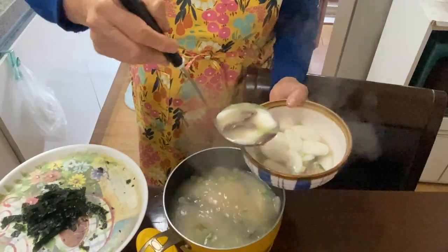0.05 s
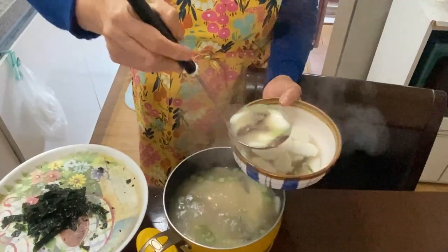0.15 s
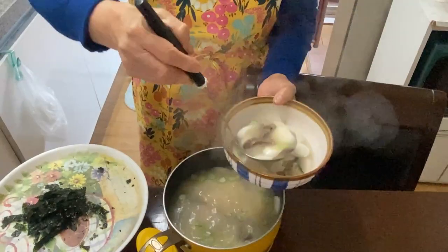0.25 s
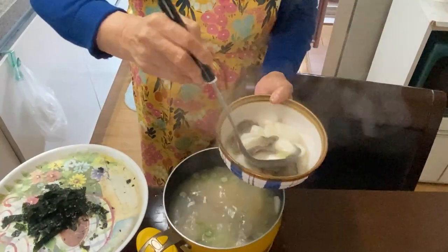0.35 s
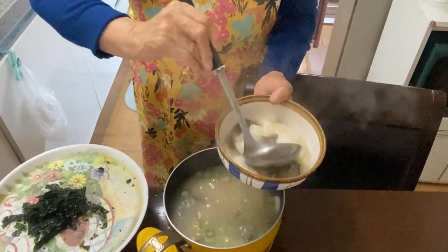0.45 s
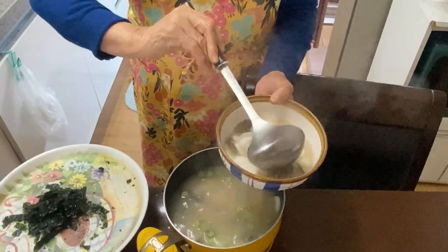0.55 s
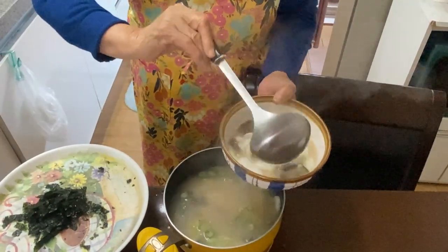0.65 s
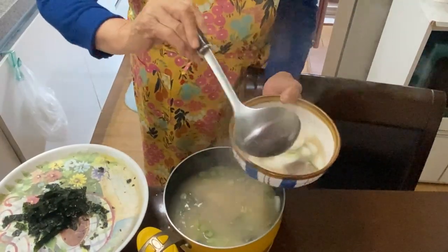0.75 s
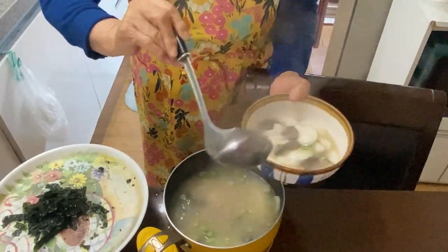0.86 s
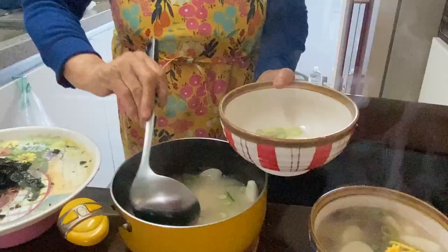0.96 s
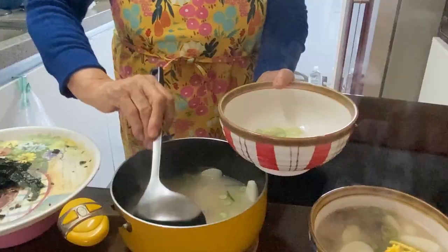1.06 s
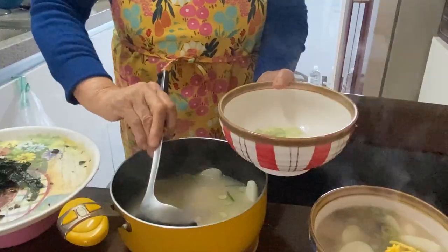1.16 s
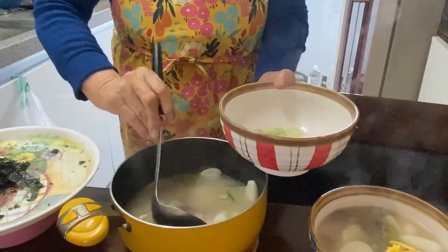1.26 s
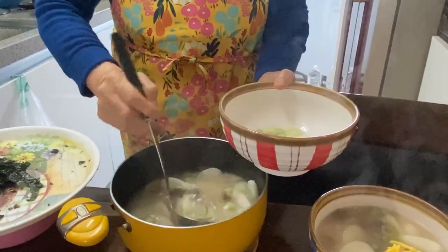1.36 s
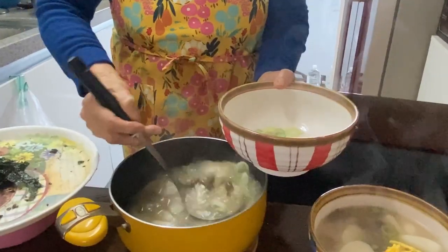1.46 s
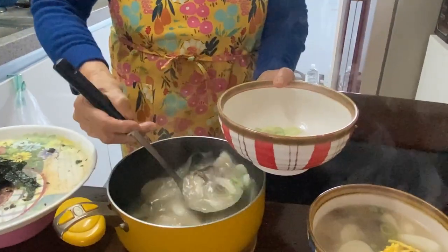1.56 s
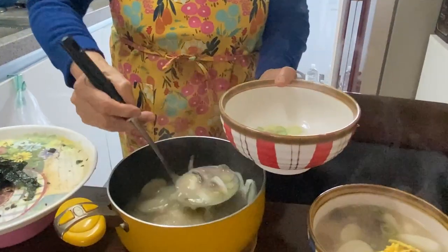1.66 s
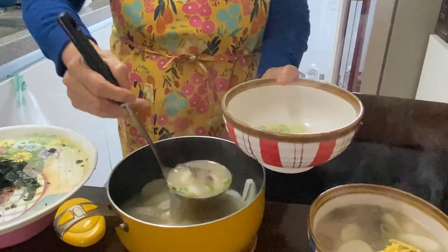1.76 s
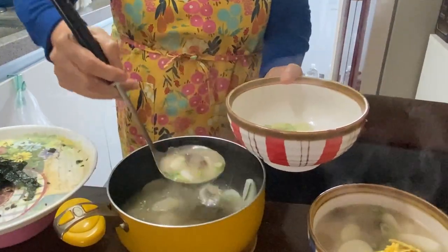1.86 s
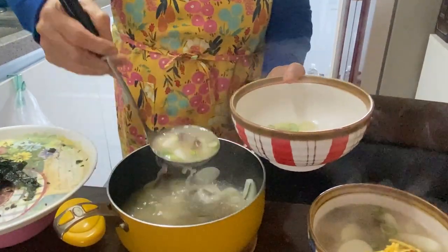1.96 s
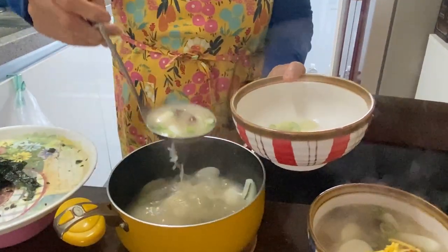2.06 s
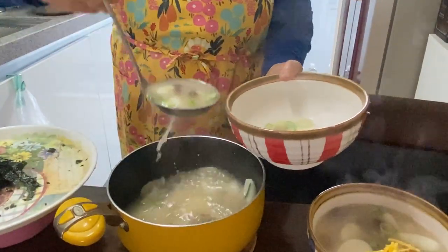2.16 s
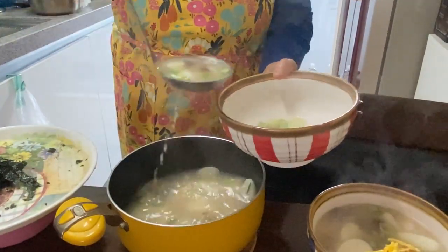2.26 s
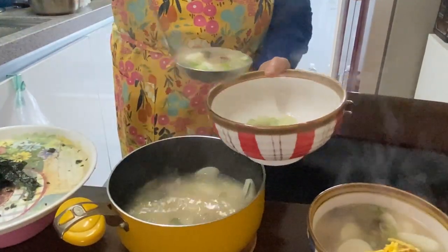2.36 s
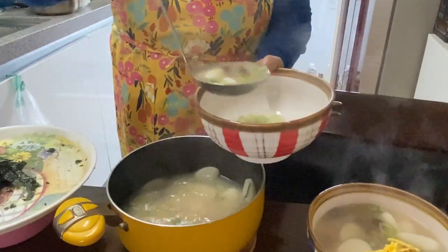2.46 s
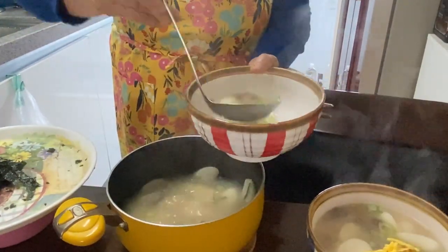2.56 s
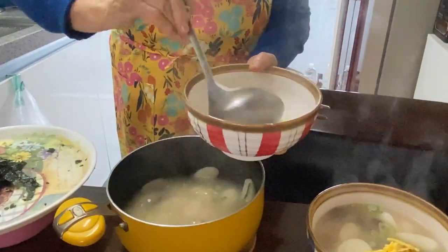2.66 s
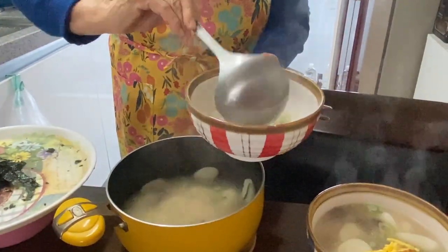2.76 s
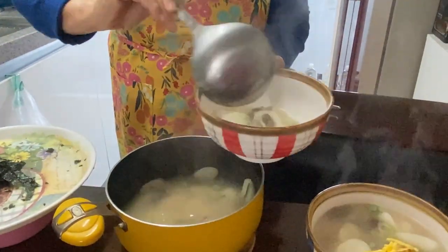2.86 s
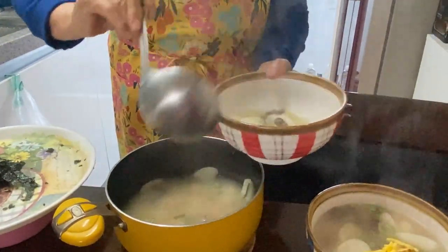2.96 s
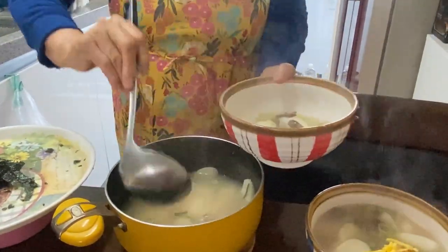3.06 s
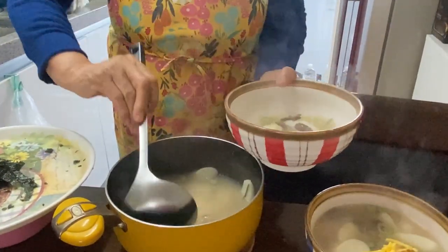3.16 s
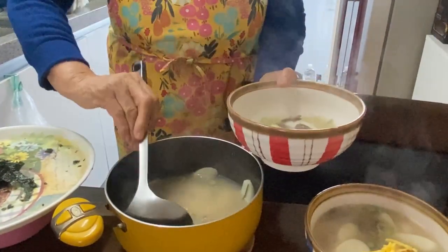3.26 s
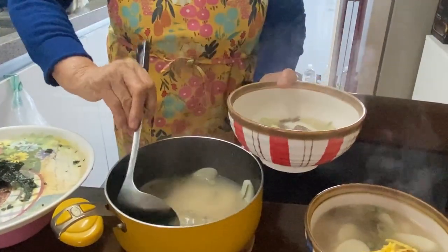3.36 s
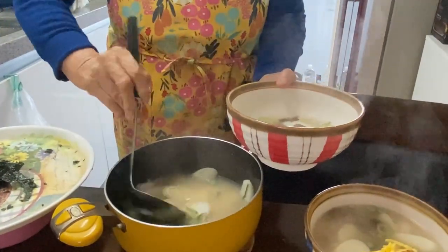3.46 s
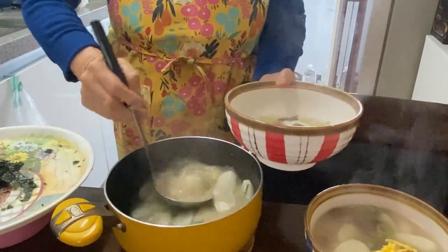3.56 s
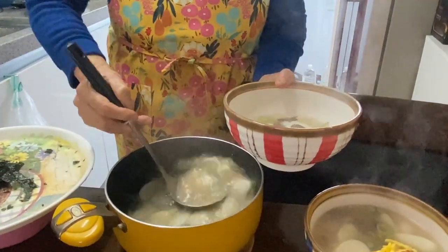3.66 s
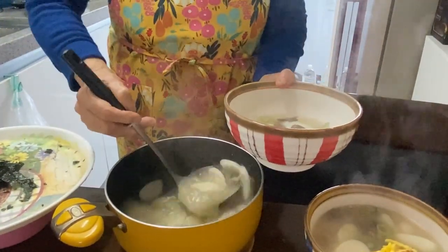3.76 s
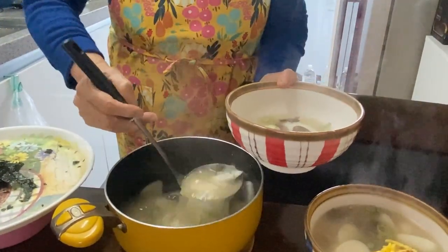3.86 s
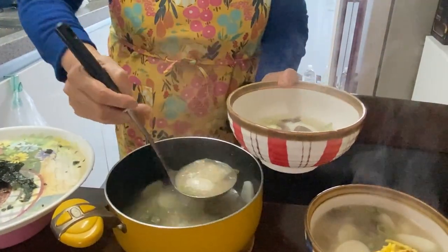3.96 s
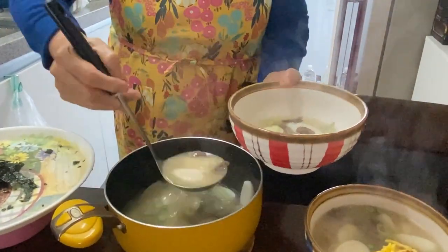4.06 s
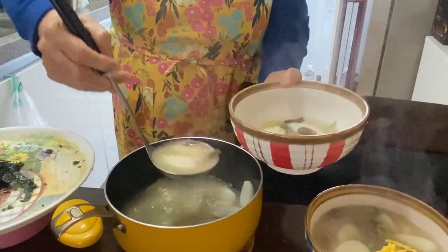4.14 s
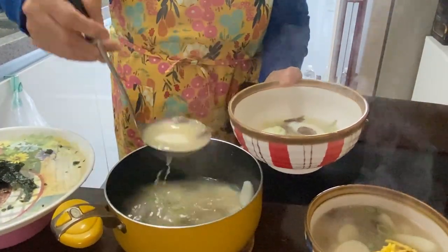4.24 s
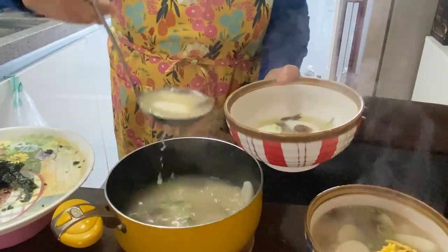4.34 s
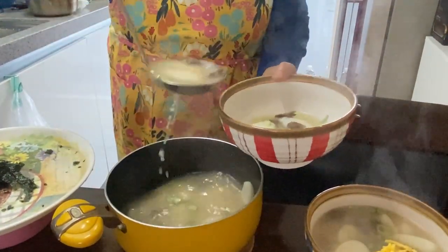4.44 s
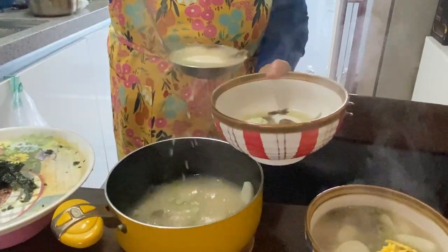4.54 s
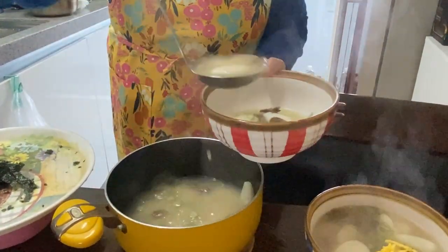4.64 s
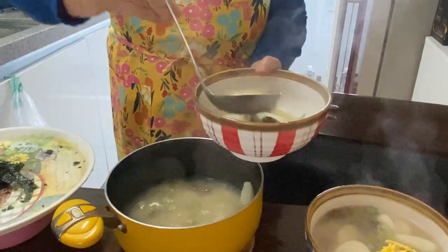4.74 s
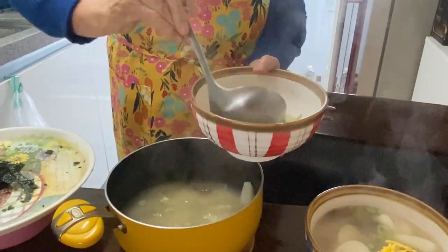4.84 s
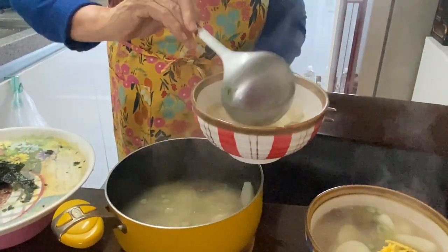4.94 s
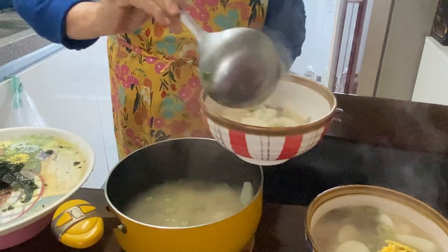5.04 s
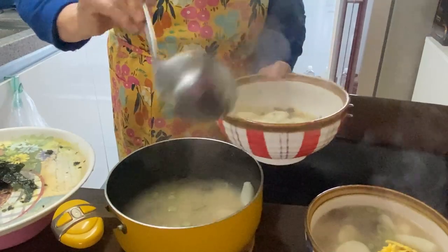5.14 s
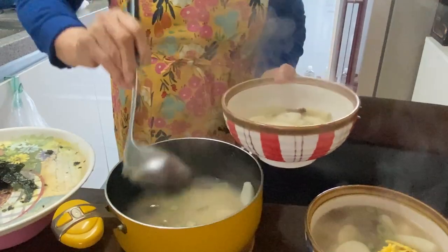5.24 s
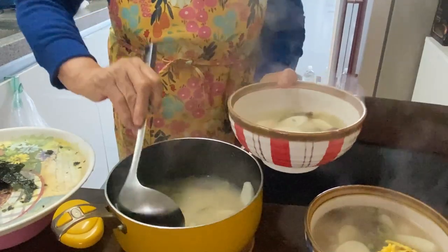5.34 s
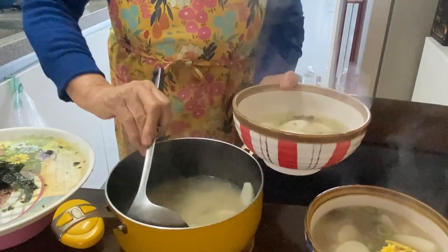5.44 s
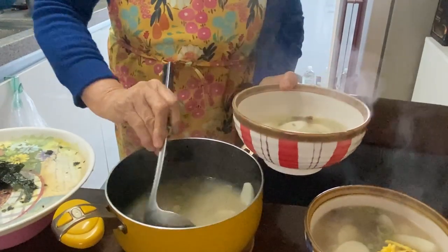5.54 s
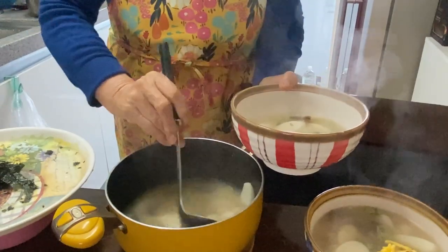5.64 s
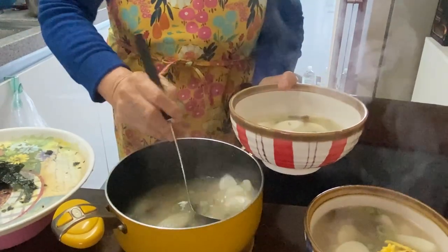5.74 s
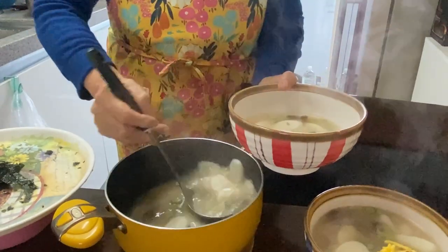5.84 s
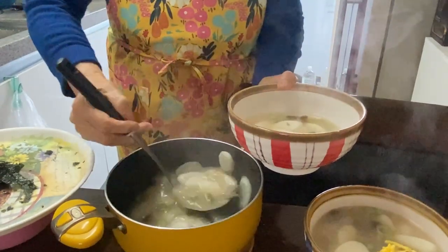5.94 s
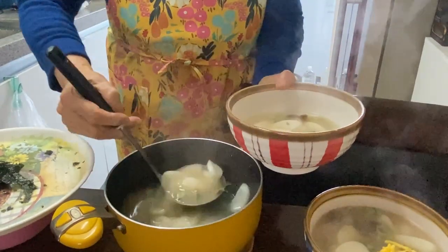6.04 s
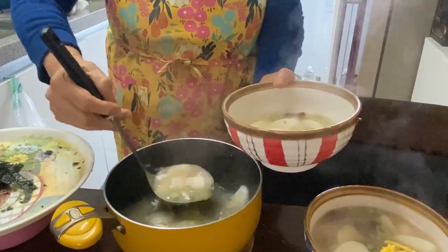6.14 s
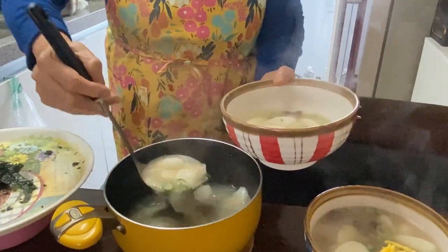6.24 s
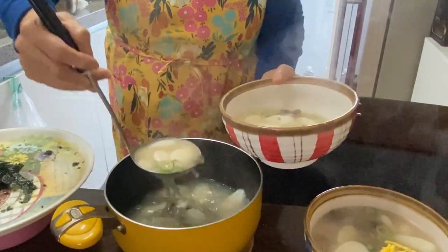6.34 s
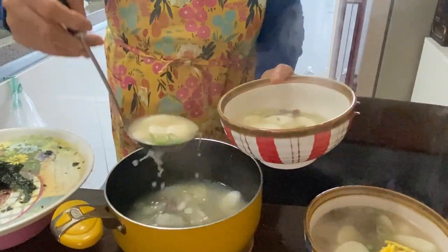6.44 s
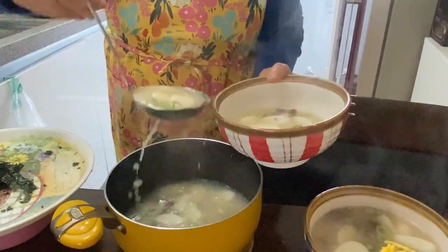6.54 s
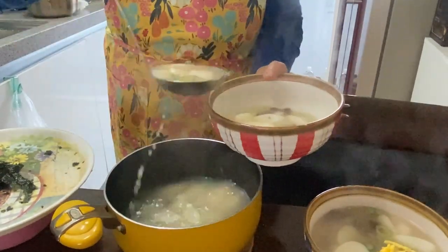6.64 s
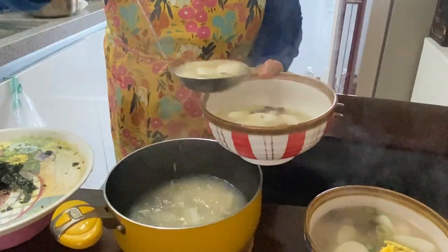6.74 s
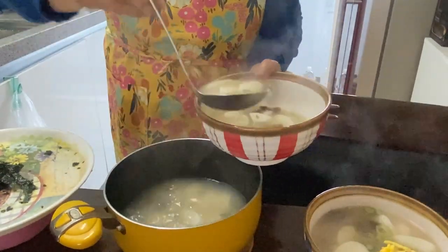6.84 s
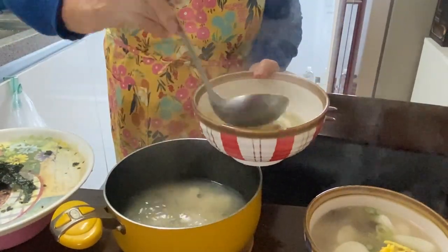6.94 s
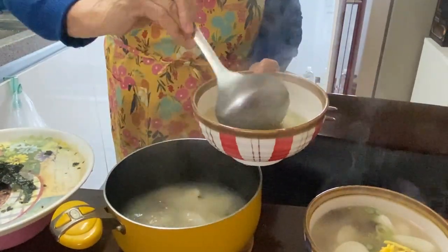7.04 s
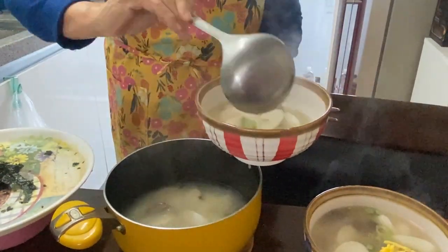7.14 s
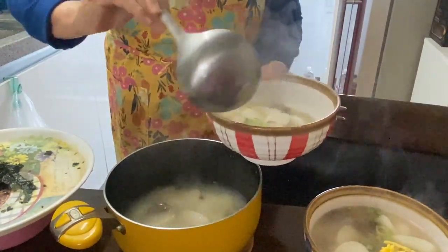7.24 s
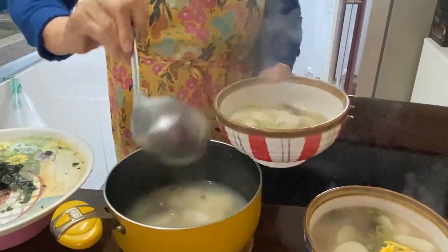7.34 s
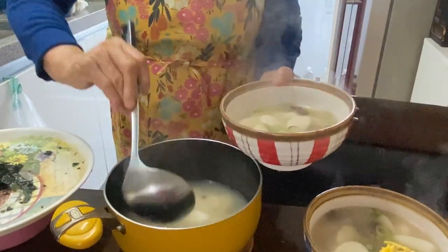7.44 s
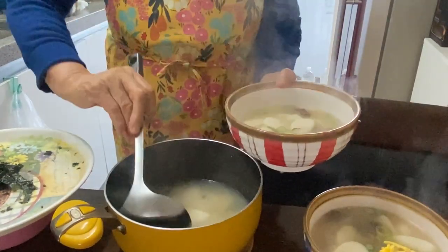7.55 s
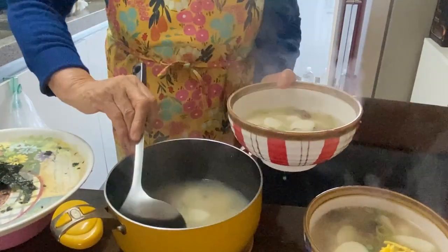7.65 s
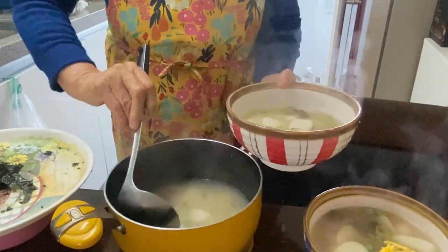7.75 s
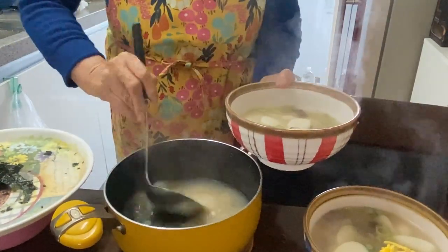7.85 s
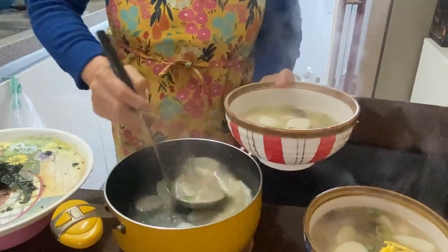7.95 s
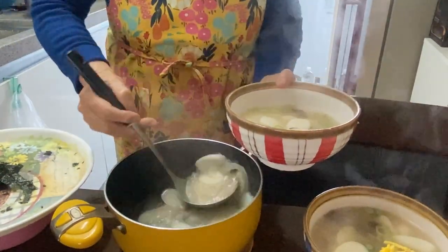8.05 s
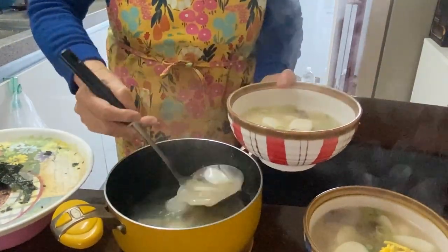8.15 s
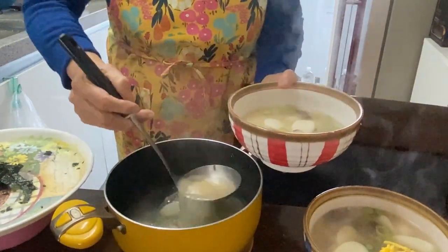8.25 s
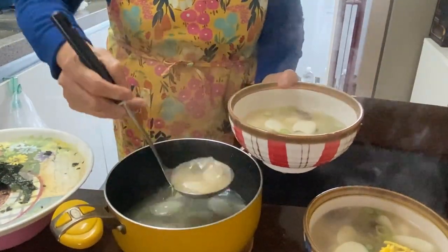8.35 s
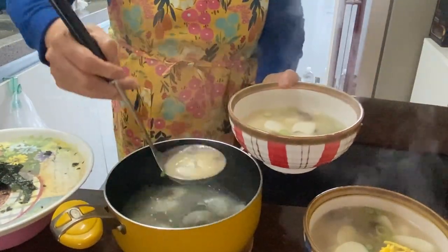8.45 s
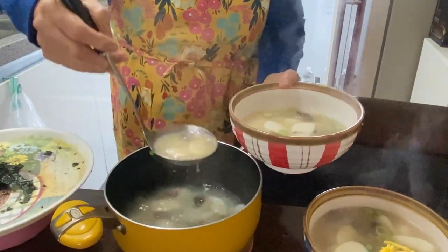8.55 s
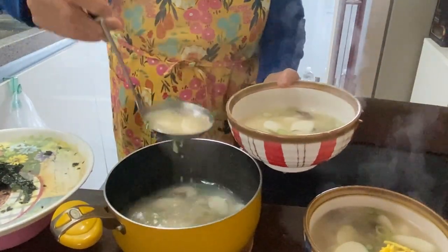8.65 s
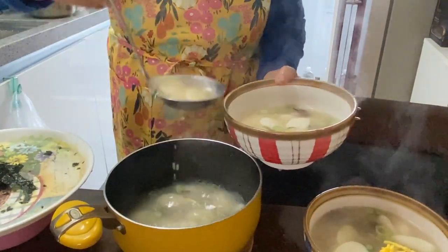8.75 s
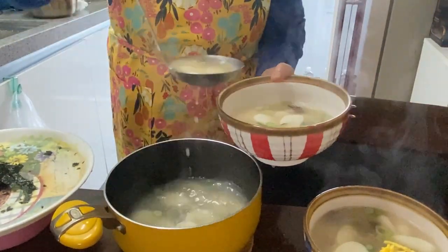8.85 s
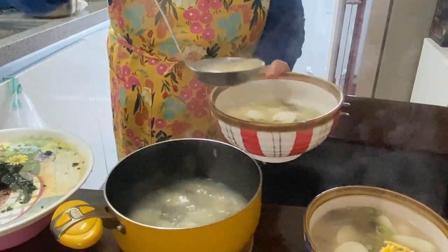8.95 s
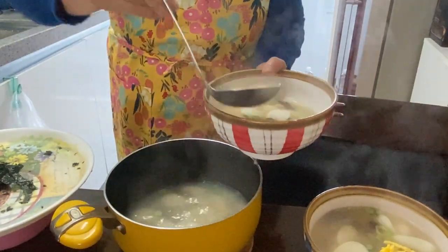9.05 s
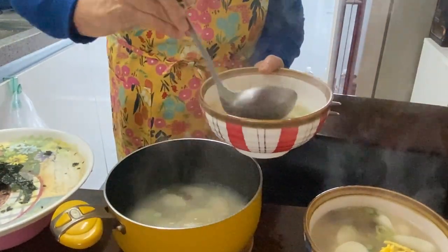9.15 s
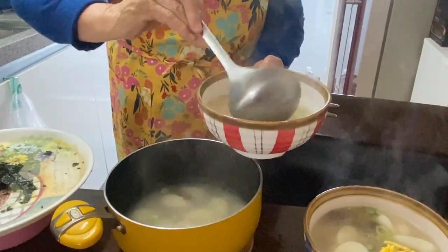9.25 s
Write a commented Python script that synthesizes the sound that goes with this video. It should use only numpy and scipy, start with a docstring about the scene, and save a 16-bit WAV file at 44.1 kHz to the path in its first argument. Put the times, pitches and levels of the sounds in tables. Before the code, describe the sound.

A thin steel ladle strikes a soup-filled pot about every two seconds, ringing briefly with a damped, bright clink. Thick soup gurgles while the rim chatters, followed by trickling droplets, small bubbly plops and gentle pouring. The pot nudges the table with dull low thuds. The microphone is near, with a short kitchen reverberation and a quiet airy background carrying weak hum and deep rumble.

```python
"""Soup drips, then in four rounds a steel ladle knocks a pot, drags through thick soup, lifts and empties.
Knocks are noise cracks over ringing modes; strokes are bubble noise and rim chatter, with thuds below.
Between rounds droplets and lumps sound as gliding bubbles and soup splashes as dense fine bubbles.
A small kitchen rings briefly; fan-like hiss, wavering hum and deep rumble of filtered noise run throughout."""
import sys
import numpy as np
from scipy import signal
from scipy.fft import rfft, irfft, next_fast_len
from scipy.io import wavfile
from scipy.ndimage import uniform_filter1d

SR = 44100
rng = np.random.default_rng(int(sys.argv[2]) if len(sys.argv) > 2 else 0)


def to_wav(sig):
    """Store sig (one row per channel, or 1-D mono) as 16-bit WAV at the path in sys.argv[1].

    Samples outside -1..1 are clipped; the rate is SR.
    """
    pcm = np.clip(np.atleast_2d(sig), -1, 1) * 32767
    pcm = np.round(pcm).astype(np.int16)
    wavfile.write(sys.argv[1], SR, pcm.T)  # frames by channels


def convert_level_to_amplitude(level_db):
    """Map a level in decibels to its linear amplitude factor."""
    exponent = np.asarray(level_db, float) / 20
    return 10 ** exponent


N = 410130

# modes of the soup-damped pot: mode_hz, width_hz (before damping), level_db, lean (bowl +1, rim -1)
POT_MODES = [(660, 34, -13, -0.11), (785, 24, -10, 0.98), (953, 14, -13, 0.42), (997, 35, -15.5, .1),
             (1174, 61, -5.5, 0.48), (1243, 35, -9.5, -.3), (1321, 36, -6, -0.16), (1434, 47, -9, -0.79),
             (1550, 35, -16.5, 0.22), (2200, 35, -13, 0.068), (2150, 39, -11.5, 0.96),
             (2534, 54, -11, -0.44), (3112, 60, -7.5, -0.38), (4930, 58, -14, .6), (5230, 45, -17.5, .1)]
# one table a stroke through the soup: time_s, slosh_db, scrape_db
STROKE_TABLES = [
    [(1.14, -41, -55), (1.186, -50, -51), (1.258, -38.5, -40.5), (1.28, -47.5, -58), (1.338, -43, -53),
     (1.352, -50, -60), (1.396, -60, -55), (1.55, -72, -78)],
    [(3.29, -48, -47.5), (3.452, -82, -62), (3.464, -45, -59), (3.518, -40.5, -51.5), (3.628, -63, -82),
     (3.632, -71, -71), (3.696, -74, -87), (3.7, -67, -73)],
    [(5.46, -39.5, -46), (5.492, -41, -52), (5.496, -36, -63), (5.538, -52.5, -50.5), (5.598, -43, -40.5),
     (5.618, -46.5, -53), (5.648, -44.5, -50.5), (5.85, -75, -77)],
    [(7.6, -54, -63), (7.69, -48, -53), (7.79, -41.5, -38), (7.868, -49.5, -53), (7.92, -41.5, -47),
     (7.924, -30, -32), (7.972, -43, -50.5), (8.2, -67.5, -66)],
]
# the pot jolts the table: time_s, thud_db, boom_db
TABLE_JOLTS = [(0.9, -87, -41), (1.14, -43.5, -37.5), (3.289, -50.5, -40), (3.47, -57, -46.5),
               (5.44, -44, -40.5), (5.65, -58.5, -46.5), (7.6, -55, -46), (7.7, -56, -45),
               (7.93, -41, -42.5)]


def evened(x):
    """Scales to rms 1."""
    return x / np.sqrt(np.mean(x ** 2) + 1e-20)


def read(points, hz):
    """Reads a spectrum on a log-frequency axis."""
    point_hz, value = np.transpose(points)
    return np.interp(np.log(hz + 1), np.log(point_hz + 1), value)


def add(mix, start_s, sound):
    """Mixes a sound in at start_s."""
    part = mix[max(round(start_s * SR), 0):][:len(sound)]
    part += sound[:len(part)]


def colour(x, spectrum):
    """Filters by a spectrum in dB; result has rms 1."""
    size = next_fast_len(len(x))
    gain = convert_level_to_amplitude(read(spectrum, np.fft.rfftfreq(size, 1 / SR)))
    return evened(irfft(rfft(x, size) * gain, size)[:len(x)])


def bursts(rows):
    """Gain over time from rows (peak_s, peak_db, rise_s, t60_s): up 30 dB per rise_s, then dying away."""
    gain, t = np.zeros(N), np.arange(N) / SR
    for peak_s, db, rise_s, t60_s in rows:
        corners_s = [peak_s - 3 * rise_s, peak_s, peak_s + 2 * t60_s]
        gain += convert_level_to_amplitude(np.interp(t, corners_s, [db - 90, db, db - 120], -200, -200))
    return gain


def random_sizes(count, spread_db):
    """Exponentially spread dB, as gains."""
    return convert_level_to_amplitude(spread_db * np.minimum(rng.exponential(1, count), 4))


def clicks(per_s, spread_db):
    """Sparse random impulses, a few of them large."""
    return random_sizes(N, spread_db) * (rng.random(N) < per_s / SR) * rng.choice([-1., 1.], N)


def bubble(hz, cycles, glide):
    """A damped air bubble of peak 1 whose pitch glides by a share as it nears the surface."""
    u = np.arange(int(5 * cycles * SR / hz) + 8) * hz / SR / cycles
    shape = (1 - np.exp(-u * 5)) * np.exp(-u * 1.3)
    phase_cycles = cycles * (u + glide * (u - np.tanh(u)))
    return np.sin(2 * np.pi * phase_cycles) * shape / shape.max()


def fizz(per_s, lo_hz, hi_hz, cycles, spread_db):
    """Many bubbles of random size on 24 pitches, at rms 1."""
    out, count = np.zeros(N), 24
    for hz in np.geomspace(lo_hz, hi_hz, count):
        at = np.flatnonzero(rng.random(N // 8) < 8 * per_s / count / SR) * 8
        train = np.zeros(N)
        train[at] = random_sizes(len(at), spread_db)
        out += signal.oaconvolve(train, bubble(hz, cycles, glide=0.024))[:N]
    return evened(out)


def ring(modes, damping, t, tilt_db=0, after=0):
    """An object's dying partials: a quick first decay and a share that lingers."""
    hz, width_hz, db = np.transpose(modes)[:, :, None]
    db = db + 1.2 * rng.standard_normal(hz.shape) + tilt_db * np.log2(hz / 2000)
    size = convert_level_to_amplitude(db) * np.sqrt(width_hz)
    rate = np.pi * width_hz * damping
    lingering = after * np.sqrt(width_hz.min() / width_hz) * np.exp(-0.27 * rate * t)
    decay = np.exp(-rate * t) + lingering
    return (size * decay * np.sin(2 * np.pi * (hz * t + rng.random(hz.shape)))).sum(0)


def knocks():
    """Each blow is a few ms of crack plus the ringing of ladle and pot."""
    # ladle meets pot: time_s, level_db, tilt_db_per_octave, ladle_over_pot_db, bowl_over_rim_db
    blows = [(1.0569, -11, -6, -3.5, -4.5), (1.13, -22.5, 3.5, -20, 6), (3.1961, -3.5, -3, 6, 1.5),
             (3.229, -15.5, 1.5, -35, 1.5), (5.391, -7, -1.5, -7, 2.3), (5.447, -22, -5.5, -18, 14),
             (7.5158, -14, -3, 0, 1), (7.554, -20, -4.5, 0, 2), (7.58, -21.5, -6.5, -8, -8),
             (7.674, -33.5, -8.5, -1.5, 0), (7.925, -21.5, 5.5, -16, -8)]
    # modes of the thin steel ladle: mode_hz, width_hz (before damping), level_db, lean (bowl +1, rim -1)
    ladle_modes = [(2450, 26, -13, -1.2), (3221, 40, -2, -1.2), (3698, 18, -3, 0.99), (3786, 35, -9, -1),
                   (4620, 13, -7.5, -0.91), (4670, 41, -14, -1), (5563, 11, -6.5, 0.94),
                   (5656, 16, -8.5, 0.86), (6700, 28, -11.5, 0.91), (6870, 45, -10, -0.7),
                   (7550, 54, -2.5, 0.85), (8250, 63, -21, 1), (8850, 55, -24.5, 0.29), (10900, 67, -18, 1),
                   (12900, 40, -27, 0.94)]
    # contact noise: freq_hz, level_db_per_hz
    crack_spectrum = [(180, -11), (300, -35.5), (828, -11), (1900, 1.5), (3760, 6), (6100, 1), (7690, -3),
                      (8500, -5), (16000, -27.5)]
    out, t = np.zeros(N), np.arange(SR // 2) / SR
    for time_s, db, tilt_db, ladle_db, place_db in blows:
        damping = 2 - 0.02 * db  # soup widens the modes, more so for soft blows deeper in the pot
        ladle = [(hz, width, m_db + ladle_db + lean * place_db) for hz, width, m_db, lean in ladle_modes]
        pot = [(hz, width, m_db + lean * place_db) for hz, width, m_db, lean in POT_MODES]
        metal = ring(pot, damping, t, tilt_db)
        # the ladle sings on quietly once the soup stops damping it
        metal += ring(ladle, damping, t, tilt_db, after=convert_level_to_amplitude(-12))
        tilted = [(hz, c_db + tilt_db * np.log2(hz / 2000)) for hz, c_db in crack_spectrum]
        crack = damping * convert_level_to_amplitude(-8.5) * colour(rng.standard_normal(len(t)), tilted) * np.exp(-t / 0.0039)
        # countless close modes blur into a noisy tail
        clang = convert_level_to_amplitude(-17) * colour(rng.standard_normal(len(t)), tilted) * np.exp(-t / 0.032)
        metal /= np.sqrt(np.mean(metal[:200] ** 2))
        blow = (metal + crack + clang) * np.minimum(t / .0006, 1)
        add(out, time_s - .0005, convert_level_to_amplitude(db - 9) * blow)
        for late in rng.random(3):  # the rim chatters against the wall for a few ms
            add(out, time_s + .005 * late, convert_level_to_amplitude(db - 21) * blow)
    return out


def stroke_gain(column):
    """Gain over time from one column of the strokes, fading to silence outside each."""
    gain, t = np.zeros(N), np.arange(N) / SR
    for rows in STROKE_TABLES:
        rows = np.array(rows)
        corners_s = np.r_[rows[0, 0] - .02, rows[:, 0], rows[-1, 0] + .04]
        gain += convert_level_to_amplitude(np.interp(t, corners_s, np.r_[-90, rows[:, column], -90], -200, -200))
    return gain


def brighten(x, pivot_hz, bright_db):
    """Lifts what lies above a pivot and lowers what lies below, per stroke, at unchanged power."""
    starts_s = [rows[0][0] - .1 for rows in STROKE_TABLES[1:]]
    lift = convert_level_to_amplitude(np.array(bright_db)[np.searchsorted(starts_s, np.arange(N) / SR)])
    low = signal.sosfiltfilt(signal.butter(2, pivot_hz, fs=SR, output="sos"), x)
    high = x - low
    power = np.mean(low ** 2) / lift ** 2 + np.mean(high ** 2) * lift ** 2
    return (low / lift + high * lift) / np.sqrt(power)


def strokes():
    """Soup gurgles round the bowl of the ladle while its rim chatters on the pot and froth crackles."""
    # gurgling soup: freq_hz, level_db_per_hz
    slosh_spectrum = [(210, -37), (350, 0.5), (482, -1.5), (546, 0.5), (670, 7), (1360, -1.5), (1800, -14),
                      (2170, -20), (2500, -15), (3250, -47), (5500, -120)]
    # rim and froth: freq_hz, level_db_per_hz
    scrape_spectrum = [(880, -4), (1500, -1.5), (2080, -6), (2770, -3.5), (3550, -5.5), (4040, -8),
                       (7170, -15.5), (9280, -27.5), (16000, -51.5)]
    gurgle = fizz(600, 439, 2500, cycles=2.6, spread_db=3.5)
    slosh = colour(gurgle + 0.5 * rng.standard_normal(N), slosh_spectrum)
    grit = evened(clicks(3200, spread_db=2.8))
    froth = fizz(1800, 1732, 9000, cycles=4.0, spread_db=2.5)
    body = ring([mode[:3] for mode in POT_MODES[:13]], 3.1, np.arange(4000) / SR, tilt_db=4.0)
    pot_chatter = evened(signal.oaconvolve(grit, body)[:N])
    scrape = evened(colour(grit + 0.81 * froth, scrape_spectrum) + 0.56 * pot_chatter)
    slosh = brighten(slosh, 1540, bright_db=[7, -7, 8.5, 6])
    scrape = brighten(scrape, 5300, bright_db=[4.2, 3.7, 4.4, 2.6])
    return stroke_gain(column=1) * slosh + stroke_gain(column=2) * scrape


def thuds():
    """The pot thuds on the table when the ladle pushes it: low noise over a faint steady part."""
    # table thud: freq_hz, level_db_per_hz
    thud_spectrum = [(50, -41), (95, -0.5), (170, 4), (250, -2.5), (360, -2), (600, -43.5)]
    rise_s, t60_s = 0.09, 0.43
    gain = convert_level_to_amplitude(-73.5) + bursts([(s, db, rise_s, t60_s) for s, db, _ in TABLE_JOLTS])
    return gain * colour(rng.standard_normal(N), thud_spectrum)


def splashes():
    """Dense fine bubbles and smooth noise while soup lands."""
    # landing soup: peak_s, peak_db, rise_s, t60_s
    landings = [(0.002, -50.5, 0.011, 0.17), (0.322, -57, 0.023, 0.35), (0.4, -52, 0.027, 0.19),
                (1.902, -51, 0.0098, 0.021), (1.96, -62.5, 0.045, 0.68), (2.628, -39.5, 0.04, 0.11),
                (3.816, -54, .006, 0.21), (3.95, -56.5, .07, 0.11), (4.822, -31, 0.018, 0.042),
                (4.86, -61, .03, .5), (6.3, -57, 0.022, 0.25), (6.444, -60, 0.088, 0.089),
                (6.5, -64, .02, 0.23), (6.91, -52.5, .01, 0.22), (6.976, -42.5, .014, .2),
                (7.09, -62.5, .05, .3), (8.312, -53, .01, 0.29), (9.15, -52.5, .04, 0.058),
                (9.182, -57.5, .012, .15)]
    # spray, before flattening: freq_hz, level_db_per_hz
    spray_spectrum = [(350, -78), (600, -10.5), (858, -15.5), (1510, -19), (3120, 0), (3480, -11),
                      (5330, 2.5), (5870, 2), (16000, -40.5)]
    spray = fizz(1000, 861, 10600, cycles=1.63, spread_db=5) + 0.4 * rng.standard_normal(N)
    return bursts(landings) * colour(spray, [(hz, 0.4 * db) for hz, db in spray_spectrum])


def droplets():
    """Each droplet traps a small bubble, after a tiny bright slap, and throws up tinier ones."""
    # the clearest droplets: time_s, peak_db, pitch_hz, ringing_cycles
    drops = [(0.0593, -45.5, 5660, 9.3), (0.153, -48, 5700, 7.2), (0.318, -45, 5300, 1.9),
             (0.343, -41, 5500, 3.3), (0.3904, -43, 5300, 4.6), (0.4038, -35.5, 5000, 5.7),
             (0.5761, -41.5, 4450, 1), (0.6561, -42, 2930, 1.9), (1.3118, -38, 3240, 4.4),
             (1.3867, -35, 6900, 1.3), (1.421, -44, 6540, 4.1), (1.49, -46, 6000, 2.8),
             (1.641, -49, 8360, 2.7), (1.673, -47, 7360, 4.4), (1.7429, -41, 7640, 1.3),
             (1.772, -45.5, 3370, 5.6), (1.897, -41, 3230, 6.9), (1.9, -34.5, 7350, 9.5),
             (1.906, -34.5, 9750, 1.8), (1.9166, -37, 3710, 3.4), (1.938, -38, 5750, 4.7),
             (1.967, -29, 2980, 1.3), (1.967, -39, 7940, 4.2), (1.981, -55, 8360, 2.7),
             (1.999, -42, 5500, 12), (2.049, -32.5, 7260, 1.6), (2.0638, -41, 6000, 3.1),
             (2.075, -47, 12000, 3), (2.1084, -35.5, 5900, 6), (2.127, -44, 5940, 3.3),
             (2.1802, -36, 3230, 4.3), (2.2523, -43, 10000, 2.4), (2.276, -29.5, 2860, 1.34),
             (2.279, -41, 6650, 6.5), (2.2975, -39.5, 6900, 3.6), (2.5962, -29.5, 6300, 2.6),
             (2.62, -35, 6140, 4.3), (2.6317, -36, 8080, 1.8), (2.719, -46.5, 9210, 4.1),
             (2.8075, -43, 4930, 1.4), (2.8926, -49, 3220, 12), (3.502, -44, 10360, 2.6),
             (3.549, -38, 2320, 2.9), (3.5843, -45.5, 7150, 5.2), (3.6343, -41.5, 4260, 2.1),
             (3.7183, -41, 3420, 7.3), (3.7833, -43.5, 2980, 4), (3.819, -39, 3300, 2.8),
             (3.818, -45, 6050, 3), (3.8903, -49.5, 3010, 4.7), (4.1424, -45, 7600, 8.8),
             (4.3088, -37.5, 1985, 3.5), (4.3394, -38, 5800, 4.2), (4.425, -38.5, 3750, 1.5),
             (4.6013, -42, 5300, 2), (4.6385, -49, 2810, 12), (4.7, -45.5, 3060, 7.3),
             (4.7776, -46, 10150, 4.2), (4.809, -39, 4200, 5.2), (4.8224, -16.5, 6630, 5.2),
             (4.8226, -18.5, 9000, 2.3), (4.9907, -46, 3120, 2.4), (5.04, -50, 5930, 5.7),
             (5.1623, -43.5, 7020, 2.6), (5.3036, -48, 9200, 4.4), (5.661, -32, 7230, 5.9),
             (5.7283, -41, 5940, 3.9), (5.7809, -36, 9050, 1.5), (5.8849, -53.5, 2940, 5.4),
             (5.9543, -46, 7010, 3.2), (6.0463, -49, 6600, 3.5), (6.1468, -49, 6040, 5.7),
             (6.2144, -46.5, 4660, 2.7), (6.2728, -57, 8700, 2.9), (6.3054, -45, 1790, 2.6),
             (6.3544, -44, 3450, 7.8), (6.44, -47, 4510, 5.4), (6.452, -47, 11000, 3),
             (6.4984, -37.5, 7650, 4.4), (6.51, -36, 4300, 3.8), (6.6125, -28, 6250, 2.5),
             (6.677, -41, 3430, 2.4), (6.6796, -47, 10700, 5.1), (6.728, -34.5, 6320, 1.3),
             (6.913, -35.5, 3150, 8.3), (6.974, -28.5, 6620, 2.7), (6.9839, -29.5, 3120, 4.9),
             (7.085, -29.5, 5830, 1), (7.899, -31, 8000, 2.5), (7.909, -25, 6550, 2.2),
             (8.0657, -33.5, 2950, 2.7), (8.1144, -47.5, 9150, 3.6), (8.1632, -41, 7020, 10),
             (8.184, -38, 6300, 2.5), (8.238, -42.5, 6700, 2.7), (8.312, -46.5, 2400, 6.4),
             (8.3136, -41, 3430, 6.9), (8.358, -46, 4800, 3.2), (8.5015, -41.5, 2430, 1.7),
             (8.7498, -50, 3420, 5.5), (9.145, -45.5, 9200, 1.5)]
    out = np.zeros(N)
    for time_s, db, hz, cycles in drops:
        glide = -0.04 + 0.115 * rng.standard_normal()
        slap = np.diff(rng.standard_normal(30), 2) * np.exp(-np.arange(28) / 18.0)
        add(out, time_s - .0002, convert_level_to_amplitude(db) * bubble(hz, cycles, glide))
        add(out, time_s - .0002, convert_level_to_amplitude(db - 24.5) * slap)
        for late, size, faint in rng.random((3, 3)):  # spatter lands within 50 ms
            spatter_db = min(db, -34) - 19 * (.5 + faint)
            add(out, time_s + .05 * late, convert_level_to_amplitude(spatter_db) * bubble(8500 * (0.395 + size), 4.5, glide))
    return out


def plops():
    """Lumps plop as large bubbles with weaker neighbours."""
    # lumps: time_s, peak_db, pitch_hz, ringing_cycles
    lumps = [(0.343, -35, 920, 5.2), (1.226, -30, 1000, 1.5), (1.643, -43.5, 1070, 4.4),
             (1.968, -46.5, 1030, 3.3), (2.274, -33.5, 1370, 1.36), (2.402, -45.5, 695, 2.2),
             (2.591, -48, 1050, 3), (2.63, -30, 920, 4.6), (2.89, -56, 807, 2.8), (3.465, -51, 692, 3.2),
             (3.782, -50, 1150, 2.5), (3.819, -52, 1220, 4.1), (3.846, -37, 1090, 1.8),
             (3.934, -50, 1275, 2.2), (4.82, -25, 887, 4.6), (5.495, -32, 820, 2.6),
             (6.304, -50.5, 1570, 2.3), (6.632, -40, 1620, 1.05), (6.974, -38.5, 2280, 2.5),
             (7.084, -35.5, 1050, 1.65), (8.163, -40, 1370, 3.3), (8.312, -46.5, 1010, 2.2),
             (8.495, -40.5, 1040, 0.8), (8.841, -50.5, 1664, 3.9), (9.144, -40, 1004, 1.9),
             (9.183, -36.5, 2030, 2)]
    out = np.zeros(N)
    for time_s, db, hz, cycles in lumps:
        add(out, time_s, convert_level_to_amplitude(db) * bubble(hz, cycles, glide=0.018))
        for late, size in rng.random((5, 2)):  # neighbours follow within 27 ms
            neighbour = bubble(hz * (.7 + 1.1 * size), cycles, glide=0.03)
            add(out, time_s + 0.027 * late, convert_level_to_amplitude(db - 7 - 10.6 * late) * neighbour)
    return out


def foam():
    """Faint stray droplets and bursting foam tick at random."""
    strays = convert_level_to_amplitude(-88) * fizz(4, 2000, 11300, cycles=5.3, spread_db=-4.5)
    return strays + convert_level_to_amplitude(-82) * fizz(25, 4900, 15000, cycles=3.5, spread_db=-2.5)


def kitchen(x):
    """Sparse taps of random sign, each band dying at its own speed."""
    # decay: freq_hz, t60_s
    decay_times = [(300, 0.32), (1000, 0.39), (3000, 0.27), (8000, 0.28), (15000, 0.079)]
    # walls swallow treble: freq_hz, level_db
    wall_colour = [(300, -1), (1000, -0.5), (3000, 0), (7000, -5.5), (14000, -6.5)]
    taps = np.zeros(SR // 2)
    at = np.arange(130, len(taps) - 20, 20)
    taps[at + rng.integers(0, 20, len(at))] = rng.choice([-1., 1.], len(at))
    hz, t, z = signal.stft(taps, SR, nperseg=256)
    decay_db = read(wall_colour, hz)[:, None] - 60 * t / read(decay_times, hz)[:, None]
    tail = signal.istft(z * convert_level_to_amplitude(decay_db), SR, nperseg=256)[1]
    return signal.oaconvolve(x, tail / np.linalg.norm(tail))[:N]


def hiss():
    """Soft fan-like noise with slow patches in time and frequency."""
    # room hiss: freq_hz, level_db_per_hz
    hiss_spectrum = [(53, -29), (90, -21), (119, -10.5), (305, -18.5), (354, -13), (733, -12.5),
                     (969, -7.5), (1800, -20.5), (3210, -21), (5250, -23.5), (7400, -28.5), (8970, -37.5),
                     (12000, -40.5)]
    # the hiss dies away at the top: freq_hz, level_db_per_hz
    top_spectrum = [(13000, -58), (16000, -68)]
    hz, _, z = signal.stft(rng.standard_normal(N + 2048), SR, nperseg=1024, noverlap=768)
    patches = uniform_filter1d(rng.standard_normal(z.shape), 12, 0)
    patches = evened(uniform_filter1d(patches, 16, 1))
    gain_db = read(hiss_spectrum + top_spectrum, hz)[:, None] + 2.0 * patches
    noise = signal.istft(z * convert_level_to_amplitude(gain_db), nperseg=1024, noverlap=768)[1][:N]
    return convert_level_to_amplitude(-63.5) * evened(noise)


def hum():
    """Low tones, each wavering with slow noise."""
    # tones: pitch_hz, waver_rms_db (of the gain on a unit sine)
    tones = [(120, -76.5), (175, -78.5)]
    out, t = np.zeros(N), np.arange(N) / SR
    for hz, db in tones:
        waver = colour(rng.standard_normal(N), [(0, 8.0), (2, 2), (5, -35.5), (20000, -120)])
        out += convert_level_to_amplitude(db) * waver * np.sin(2 * np.pi * hz * t)
    return out


def rumble():
    """Lumpy deep noise: a steady part that swells at times."""
    # deep rumble: freq_hz, level_db_per_hz
    rumble_spectrum = [(1, -6), (4, 6), (12, 6), (22, -12), (35, -16.5), (50, -22), (90, -83.5)]
    # swells: peak_s, peak_db
    swells = [(0.9, -26), (1.491, -28), (2.5, -37.5), (3.31, -29), (4.48, -36), (5.13, -38), (7.72, -29.5),
              (7.98, -37)]
    rise_s, t60_s = 0.14, 0.39
    gain = convert_level_to_amplitude(-39) + bursts([(s, db, rise_s, t60_s) for s, db in swells])
    return gain * colour(rng.standard_normal(N), rumble_spectrum)


def booms():
    """The jolted table booms: bass noise over a steady part."""
    # table boom: freq_hz, level_db_per_hz
    boom_spectrum = [(20, -48.5), (38, -2.5), (52, 6.5), (75, -4), (100, -20), (130, -58.5)]
    rise_s, t60_s = 0.074, 0.45
    gain = convert_level_to_amplitude(-57.5) + bursts([(s, db, rise_s, t60_s) for s, _, db in TABLE_JOLTS])
    return gain * colour(rng.standard_normal(N), boom_spectrum)


def snaps():
    """A low offset swells exponentially, then jumps back at once, heard as a click."""
    # offset clicks: peak_s, peak_db, swell_s
    offset_clicks = [(1.0039, -21, 0.017), (8.876, -42, 0.01)]
    out, t = np.zeros(N), np.arange(N) / SR
    for peak_s, db, swell_s in offset_clicks:
        before, after = np.minimum(t - peak_s, 0), np.maximum(t - peak_s, 0)
        out += convert_level_to_amplitude(db) * np.exp(before / swell_s - after / .00004)
    return out


def scene():
    """Near sounds with their room tail over the background."""
    metal = knocks() + strokes() + thuds()
    soup = splashes() + droplets() + plops() + foam()
    room = kitchen(convert_level_to_amplitude(-9.5) * metal + convert_level_to_amplitude(-10) * soup)
    background = hiss() + hum() + rumble() + booms() + snaps()
    return (metal + soup + room + background)[None]


def low_pass(x):
    """Removes everything above the highest recorded frequency."""
    return signal.sosfilt(signal.butter(12, 16560, fs=SR, output="sos"), x)


def record(dry):
    """Band-limits the mix to 16.2 kHz and returns the finished sound."""
    edge = signal.firwin(255, 16200, window=("kaiser", 8), fs=SR)
    mix = signal.oaconvolve(dry, edge[None], "same")
    return low_pass(mix)


dry = scene()
out = record(dry)
to_wav(out)
```